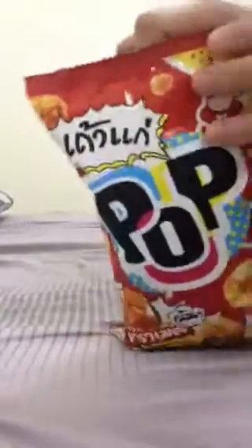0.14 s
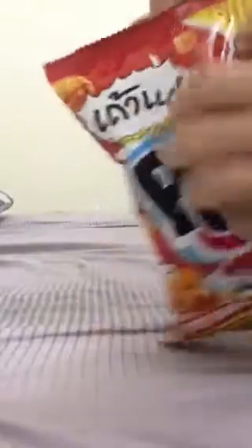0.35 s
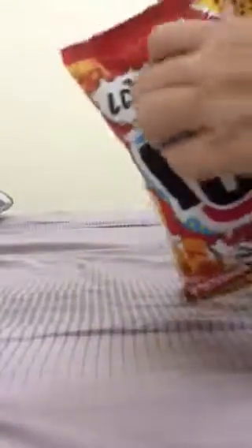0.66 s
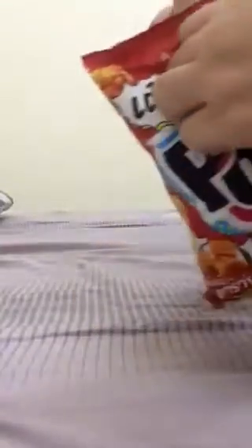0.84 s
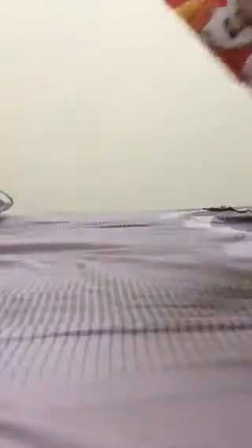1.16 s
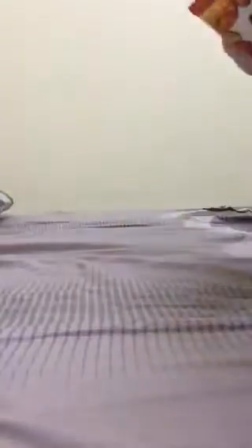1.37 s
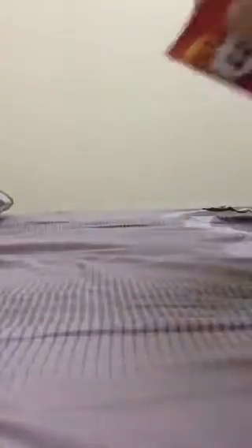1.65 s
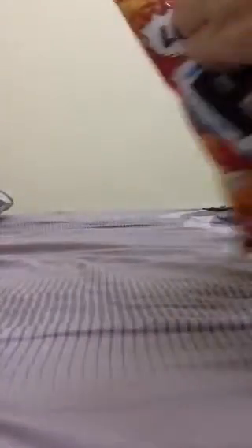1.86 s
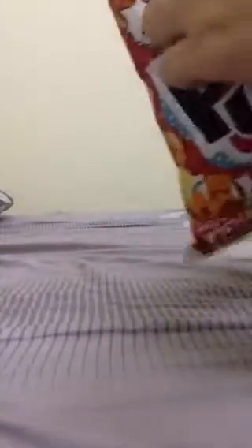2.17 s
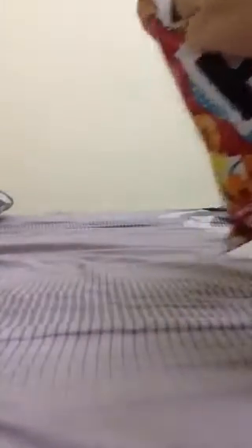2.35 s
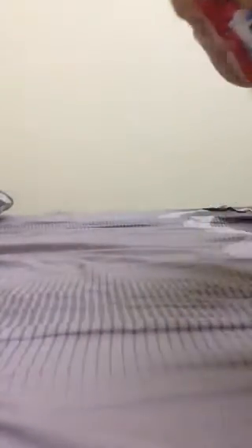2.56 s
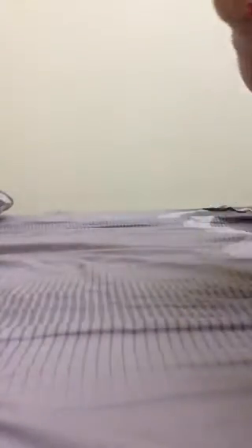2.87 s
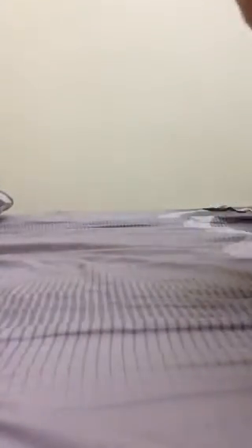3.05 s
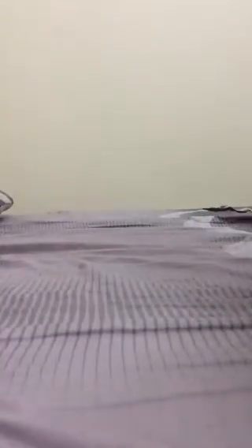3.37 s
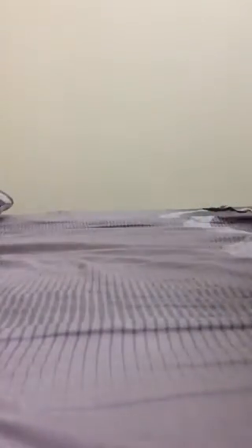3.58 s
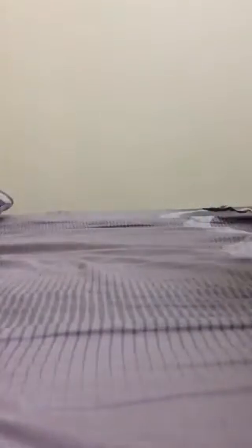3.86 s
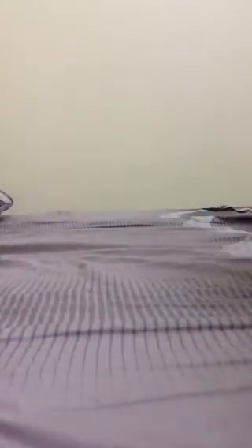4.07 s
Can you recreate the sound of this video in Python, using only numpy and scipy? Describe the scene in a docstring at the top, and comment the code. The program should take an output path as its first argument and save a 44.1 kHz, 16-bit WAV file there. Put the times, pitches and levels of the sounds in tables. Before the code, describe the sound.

A puffed-up plastic snack bag is handled close to the microphone in a small room with a faint, steady hum. From the start, tiny creases crackle in uneven bursts, while larger ones snap crisply and thump the air-filled pouch. Fingertips make soft, low bumps at about 0.1, 0.4 and 0.9 seconds. Between 1 and 1.7 seconds the crinkling is lighter and sparser, with a brief hiss of skin sliding on plastic at 1.4 seconds. The crackling picks up at 1.8 seconds with a few dull bumps, and a strong snap comes near 2.4 seconds. From 2.8 seconds the fingers slide often, adding short, high hisses. The loudest snap comes at 3.1 seconds, followed by a hollow knock at 3.3 and the hardest bump near 3.7 seconds. Crinkling and rubbing continue to the end, just after 4 seconds.

```python
"""A puffed-up plastic snack bag is lifted off a bed, turned and gripped, close by in a small, faintly humming
room. From the start, tiny creases crackle under the grip; larger ones snap singly and thump the air-filled
pouch. From 0.14 s, fingers bump the bag now and then. They slide on the film with a hiss, briefly at 1.4 s and
often from 2.8 s. The loudest snap comes at 3.1 s, the hardest bump at 3.66 s."""
import sys
import numpy as np
from scipy import signal
from scipy.fft import rfft, irfft, next_fast_len
from scipy.io import wavfile
from scipy.ndimage import uniform_filter1d, map_coordinates

SR = 44100
rng = np.random.default_rng(int(sys.argv[2]) if len(sys.argv) > 2 else 0)


def to_wav(s):
    """Save 16-bit WAV."""
    ch = np.atleast_2d(s).T  # columns
    pcm = np.round(np.clip(ch, -1, 1) * 32767)  # PCM
    wavfile.write(sys.argv[1], SR, pcm.astype(np.int16))


N = 185705


def amp(db):
    """Decibels to gain."""
    return 10 ** (np.asarray(db) / 20)


def unit(x):
    """Scaled to rms 1."""
    return x / np.sqrt(np.mean(x ** 2) + 1e-20)


def along(points, hz):
    """(frequency [Hz], value) points read on a log axis."""
    knots_hz, values = np.transpose(points)
    return np.interp(np.log(hz + 1), np.log(knots_hz), values)


def wobble(rate_hz):
    """Smooth curve through random knots."""
    knots = rng.standard_normal(int(N * rate_hz / SR) + 4)
    return map_coordinates(knots, [np.arange(N) * rate_hz / SR])


def coloured(x, spectrum):
    """Minimum-phase filter, so clicks keep sharp fronts; output rms 1."""
    size = next_fast_len(N + SR // 2, True) * 2
    gain = amp(along(spectrum, np.fft.rfftfreq(size, 1 / SR)))
    cepstrum = irfft(np.log(gain))
    response = np.exp(rfft(2 * cepstrum[:size // 2], size))
    return unit(irfft(rfft(x, size) * response)[:N])


def band(x, lo_hz, hi_hz, order=2):
    """Causal band-pass."""
    sos = signal.butter(order, [lo_hz, min(hi_hz, SR / 2 - 1)], 'band', fs=SR, output='sos')
    return signal.sosfilt(sos, x)


def placed(times_s, sounds):
    """Track with each sound at its time."""
    track = np.zeros(N)
    for start_s, sound in zip(times_s, sounds):
        part = track[max(round(start_s * SR), 0):][:len(sound)]
        part += sound[:len(part)]
    return track


def patchy(x, depth_db, bins, frames):
    """Each small facet has its own colour: random gain patches in frequency and time."""
    spectra = signal.stft(x, nperseg=128)[2]
    field = uniform_filter1d(rng.standard_normal(spectra.shape), bins, axis=0)
    field = uniform_filter1d(field, frames, axis=1)
    return signal.istft(spectra * amp(depth_db * unit(field)), nperseg=128)[1][:N]


def strokes(starts_s, holds_s, levels_db, attack_s, fade_db_per_s):
    """Envelope of hand movements: each rises, holds, fades; powers add."""
    t = np.arange(N) / SR - starts_s[:, None]
    rise = np.clip(1 + t / attack_s, 0, 1)
    fade_db = fade_db_per_s * np.maximum(t - holds_s[:, None], 0)
    return np.linalg.norm(rise * amp(levels_db[:, None] - fade_db), axis=0)


# Room air spectrum: (frequency [Hz], relative level [dB])
AIR_SPECTRUM = [(25, -29), (58, -8), (100, -6), (230, 0), (500, -1.5), (1400, -20.5), (15000, -27)]


def background():
    """Still room air with a faint 490 Hz hum."""
    hum = np.sin(2 * np.pi * 490 * np.arange(N) / SR + .5 * wobble(rate_hz=5.51))
    return amp(-57.5) * coloured(rng.standard_normal(N), AIR_SPECTRUM) + amp(-59.5) * hum


def tiny_creases(rate_hz, spread_db, t60_s, rub):
    """Creases give way at random, many weak and a few strong, over steady rubbing."""
    strength = amp(spread_db * np.minimum(rng.exponential(size=N), 3))
    kicks = (rng.random(N) < rate_hz / SR) * strength / np.sqrt(rate_hz)
    t = np.arange(SR // 20) / SR
    power = np.abs(signal.fftconvolve(kicks ** 2, amp(-60 * t / t60_s) ** 2)[:N])
    return unit(np.sqrt(power) * rng.standard_normal(N)) + rub * rng.standard_normal(N)


# Hand squeezes: (time [s], hold [s], pouch level [dB], film level [dB])
SQUEEZES = [(0, 0.0072, -37.5, -39.5), (0.071, 0.051, -40.5, -55), (0.116, 0.054, -32.5, -46),
            (0.262, 0.062, -42, -48.5), (0.42, 0.018, -30.5, -46), (0.478, 0.17, -41, -42),
            (0.776, 0.12, -44, -45.5), (.945, 0.059, -66, -52.5), (1.168, 0.06, -53, -50),
            (1.37, 0.054, -65, -50), (1.52, 0.14, -57, -56), (1.791, 0.071, -38, -39.5),
            (1.943, 0.048, -37, -49.5), (2.03, 0.094, -43.5, -53), (2.14, 0.16, -47, -42.5),
            (2.33, 0.16, -44, -48), (2.52, 0.12, -51.5, -54.5), (2.66, 0.3, -55.5, -51),
            (3.13, .09, -56, -48.5), (3.26, 0.25, -53.5, -53.5), (3.507, 0.037, -49, -40),
            (3.557, 0.029, -34.5, -36.5), (3.653, 0.032, -36, -37.5), (3.7, 0.085, -44.5, -41),
            (3.871, 0.047, -50.5, -48.5), (3.955, 0.15, -47, -42)]
# Film crackle spectrum: (frequency [Hz], relative level [dB])
FILM_SPECTRUM = [(400, -13.5), (1200, -9.5), (2300, -0.5), (3100, -2), (4400, -1.5), (7000, -7.5),
                 (11000, -10.5), (15500, -17.5)]
# Air-filled pouch spectrum: (frequency [Hz], relative level [dB])
POUCH_SPECTRUM = [(40, -46), (110, -23.5), (190, -7), (350, -4.5), (550, -3.5), (850, -1.5), (1300, -12),
                  (2500, -20.5), (6000, -31.5)]


def grip_rustle():
    """The grip crumples the film; the same tiny creases stir the pouch, which rings longer."""
    time_s, hold_s, pouch_db, film_db = np.transpose(SQUEEZES)
    pouch_gain = strokes(time_s, hold_s, pouch_db, attack_s=0.011, fade_db_per_s=281)
    film_gain = strokes(time_s, hold_s, film_db, attack_s=0.011, fade_db_per_s=220)
    pouch_gain = np.hypot(pouch_gain, amp(-59))  # floors: bag merely held
    film_gain = np.hypot(film_gain, amp(-74))
    # a harder grip frees more creases; sliding blurs them into a rub
    rate_hz = 260 * (film_gain / amp(-49.5)) ** 0.28 * (1 + slide_gain() / amp(-69))
    crackle = tiny_creases(rate_hz, spread_db=6.0, t60_s=0.013, rub=0.44)
    crackle = patchy(crackle, depth_db=2.5, bins=5, frames=3)
    stir = 0.38 * crackle + tiny_creases(rate_hz=140, spread_db=5.5, t60_s=0.024, rub=0.13)
    return film_gain * coloured(crackle, FILM_SPECTRUM) + pouch_gain * coloured(stir, POUCH_SPECTRUM)


# Snapping creases: (time [s], film level [dB], pouch level [dB], facet ring [Hz])
CREASE_SNAPS = [(0.0024, -30.0, -31.5, 6030), (0.123, -36.5, -44, 5030.0), (0.1301, -32.5, -30, 2390.0),
                (0.1461, -29.5, -28, 2960), (0.162, -39, -35, 2000), (0.1977, -39, -29, 6480.0),
                (0.2063, -39.5, -33, 1510.0), (0.213, -29, -28.5, 5400), (0.2174, -28, -27, 5440),
                (0.2568, -34, -41, 5260), (0.266, -32, -38, 5230), (0.278, -39.5, -45.5, 6770.0),
                (0.2959, -37, -36.5, 2450), (0.419, -31, -29.0, 6000), (0.4314, -31.5, -30.5, 4270),
                (0.4415, -38, -34, 4730.0), (0.5295, -31.5, -36, 5100), (0.5424, -29, -32.5, 1490),
                (0.5712, -31.5, -57, 5430), (0.5773, -33, -32.5, 4390.0), (0.587, -34.5, -32, 4590.0),
                (0.6277, -34.0, -35.5, 5940), (0.6431, -38, -30.5, 6200), (0.6735, -33.5, -36, 4460.0),
                (0.6999, -31.5, -33.5, 6050.0), (0.7803, -34, -33.5, 4440), (0.7858, -29.5, -29.5, 6000),
                (0.8189, -38, -40, 4100), (0.83, -31.0, -24.5, 4100), (0.873, -32, -19.0, 1530),
                (0.8833, -29, -30, 5150), (0.9805, -31.5, -51.0, 6700), (1.0259, -38.5, -57, 5100),
                (1.1617, -31.5, -82, 3960), (1.1755, -38.5, -33.5, 4700), (1.1895, -44.5, -33, 6820.0),
                (1.2062, -42, -31.5, 2440), (1.245, -38.5, -40.5, 2270), (1.2556, -40, -50, 5440),
                (1.3226, -37.5, -69, 4400), (1.3805, -31, -43, 5500), (1.4079, -30.5, -40.5, 5420.0),
                (1.517, -39.5, -50, 3630), (1.5446, -32.0, -55, 4640), (1.587, -38.0, -50, 4000),
                (1.6246, -33.5, -44.5, 5470.0), (1.7575, -35.5, -65, 3820.0),
                (1.7881, -29.5, -32.5, 4210.0), (1.8346, -34, -36.0, 5000), (1.845, -31, -35.5, 5080.0),
                (1.916, -32.5, -48, 4600), (1.9414, -26.5, -41, 5930), (1.9589, -38.5, -27, 4460.0),
                (2.137, -34, -34, 2300), (2.2178, -31, -31.5, 3520), (2.2232, -29.5, -24.5, 4400),
                (2.23, -29.5, -31.5, 4450), (2.3373, -26.5, -32.5, 6500), (2.3436, -27.5, -40, 3470),
                (2.3774, -29.5, -32.5, 5200), (2.4364, -23, -21.5, 3960), (2.4426, -28.5, -31, 5520.0),
                (2.5457, -35, -37, 4500), (2.65, -38, -29.5, 3700), (2.678, -26, -36, 4460),
                (2.7493, -35, -40.5, 1850.0), (2.7784, -33.5, -39.5, 4500), (2.8356, -31, -42.5, 3900),
                (2.8774, -45, -37, 3700), (2.8954, -33.5, -40, 4200), (2.9596, -39.5, -54, 4750),
                (3.0295, -30, -41, 4710.0), (3.0892, -29.5, -47, 4460), (3.1004, -31, -41, 4400),
                (3.1274, -17.5, -31, 4460), (3.398, -35.5, -61, 4250), (3.4105, -41.5, -49, 2140.0),
                (3.4194, -39.5, -63, 3700), (3.5162, -38.5, -39.5, 4970), (3.5592, -33.0, -32, 8100),
                (3.5913, -33.5, -45, 2550), (3.6455, -29.5, -39, 8160), (3.6556, -29, -30, 4370),
                (3.6765, -27, -33, 3970), (3.6936, -31.5, -32, 4020.0), (3.7305, -34, -46, 3640.0),
                (3.7602, -34, -44, 4110.0), (3.9491, -33.5, -42.5, 4050), (4.0027, -29.5, -43, 7500),
                (4.028, -36.5, -39, 7400.0), (4.038, -32, -69.0, 4360)]


def crease_snaps():
    """A facet of film flips: a pressure step, a brief ring, then flutter dying in sheet and pouch."""
    time_s, film_db, pouch_db, ring_hz = np.transpose(CREASE_SNAPS)[:, :, None]
    t = np.arange(SR // 20) / SR

    def unit_onset(x):
        """Scaled to rms 1 over the first 5 ms."""
        return x / np.sqrt(np.mean(x[:, :SR // 200] ** 2, axis=1, keepdims=True))

    def crack(step, t60_s):
        """One kick, then its scatter from the other creases."""
        scatter = rng.standard_normal((len(time_s), len(t))) * amp(-60 * t / t60_s)
        return step * (t == 0) + scatter / np.linalg.norm(scatter, axis=1, keepdims=True)

    facet = np.sin(2 * np.pi * ring_hz * t) * amp(-60 * t * ring_hz / 17)  # t60: 17 cycles
    ring = signal.fftconvolve(crack(step=2.3, t60_s=0.01), facet, axes=1)[:, :len(t)]
    # facets are too small to radiate bass
    ring = np.array([band(row, 0.75 * hz, 2.07 * hz) for row, hz in zip(ring, ring_hz[:, 0])])
    pull_db = pouch_db - film_db
    purity = 1.6 * amp(-0.31 * pull_db)  # less pull on the pouch, purer ring
    flutter = unit_onset(band(crack(step=0.11, t60_s=0.017), 3280, 5380, order=3))
    film = unit_onset(flutter + purity * unit_onset(ring))
    edge = unit_onset(band(crack(step=0.23, t60_s=0.014), 5430, 14000, order=3))
    # small facets and strong pull sharpen the edge
    edge_db = film_db - 3 + 2.5 * np.log2(ring_hz / np.median(ring_hz)) + 0.22 * pull_db
    # wide panels flex between facet ring and pouch thump
    panel = unit_onset(band(crack(step=0.077, t60_s=0.018), 1846, 2615))
    panel_db = .5 * (film_db + pouch_db) - 5.5
    thump = unit_onset(band(crack(step=0.47, t60_s=0.025), 405, 1036))
    snaps = amp(film_db) * film + amp(edge_db) * edge + amp(panel_db) * panel - amp(pouch_db) * thump
    return placed(time_s[:, 0], snaps)


# Room decay: (frequency [Hz], t60 [s])
ROOM_DECAY = [(600, 0.36), (14000, 0.18)]


def room_reverb(x):
    """The walls answer after 6 ms; treble dies first."""
    hz, t, spectra = signal.stft(rng.standard_normal(SR // 2), SR, nperseg=256)
    decay = amp(-60 * t / along(ROOM_DECAY, hz)[:, None])
    tail = signal.istft(spectra * decay, SR, nperseg=256)[1]
    tail = np.pad(tail / np.linalg.norm(tail), (round(.006 * SR), 0))
    return signal.fftconvolve(x, tail)[:N]


# Fingertip bumps: (time [s], level [dB], pitch [Hz])
FINGER_BUMPS = [(0.142, -25, 228), (0.429, -25, 218), (0.872, -29, 239), (1.789, -30.5, 192),
                (1.955, -34.5, 184), (1.986, -36, 172), (2.877, -23, 884), (3.269, -14.5, 600),
                (3.501, -30, 208), (3.572, -21.5, 330), (3.657, -9, 657), (3.698, -34, 228)]


def finger_bumps():
    """A soft fingertip pushes the air cushion: ten damped cycles, so low bumps last longer."""
    time_s, level_db, pitch_hz = np.transpose(FINGER_BUMPS)[:, :, None]
    t = np.arange(SR // 8) / SR
    rise = 1 - np.exp(-t / 0.0014)
    push = np.sin(2 * np.pi * pitch_hz * t) * amp(-60 * t * pitch_hz / 10) * rise
    shudder = unit(band(rng.standard_normal(push.shape), 110, 760)) * amp(-60 * t / 0.092)
    return placed(time_s[:, 0], amp(level_db) * (push + 0.043 * shudder))


# Finger slides: (time [s], hold [s], level [dB])
FINGER_SLIDES = [(1.37, .015, -47), (2.768, 0.025, -50), (2.87, 0.02, -47.5), (3.035, 0.011, -48.5),
                 (3.105, 0.085, -45.5), (3.251, 0.089, -50), (3.49, .16, -58), (3.7, 0.057, -50.5),
                 (3.964, .2, -45.5)]


def slide_gain():
    """How strongly the fingers rub along the film."""
    return strokes(*np.transpose(FINGER_SLIDES), attack_s=0.022, fade_db_per_s=176)


# Skin-on-film spectrum: (frequency [Hz], relative level [dB])
HISS_SPECTRUM = [(1200, -17.5), (2500, -3), (4500, 1), (6700, -2.5), (9300, 11.5), (11500, -0.5),
                 (14000, 12.5), (15500, -6.5)]


def slide_hiss():
    """Skin rubs over film; the reflection off the moving bag combs the hiss with shifting ridges."""
    hiss = patchy(rng.standard_normal(N), depth_db=2, bins=3, frames=14)
    lag_samples = SR * 0.000459 * amp(2.4 * wobble(rate_hz=35))
    reflection = 0.55 * map_coordinates(hiss, [np.arange(N) - lag_samples])
    flicker = amp(2.8 * wobble(rate_hz=120))
    return slide_gain() * flicker * coloured(hiss + reflection, HISS_SPECTRUM)


def scene():
    """The bag close by, the room far behind it; mono."""
    bag = crease_snaps() + grip_rustle() + finger_bumps() + slide_hiss()
    return (bag + amp(-18) * room_reverb(bag) + background())[None]


def record(dry):
    """Steep low-pass at 15.6 kHz."""
    return signal.sosfilt(signal.ellip(10, .1, 80, 15600, fs=SR, output='sos'), dry)


dry = scene()
out = record(dry)
to_wav(out)
```